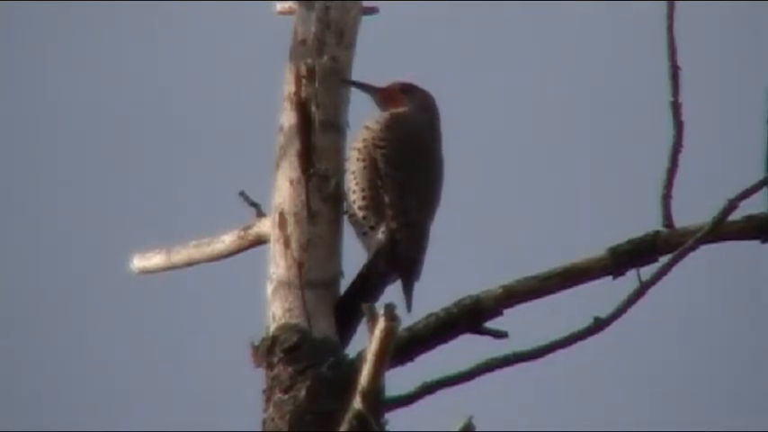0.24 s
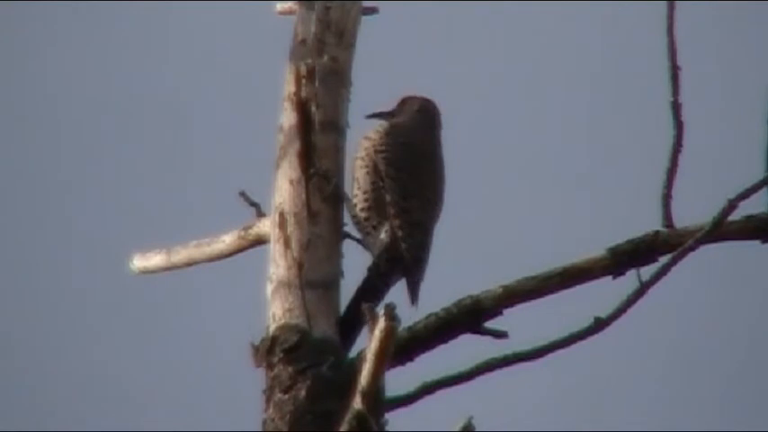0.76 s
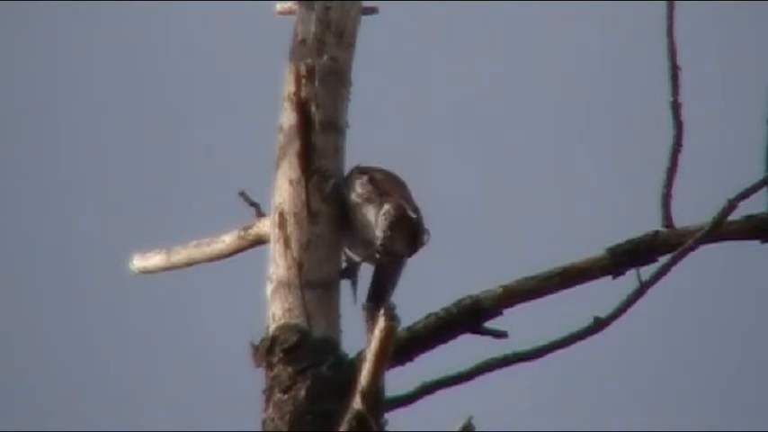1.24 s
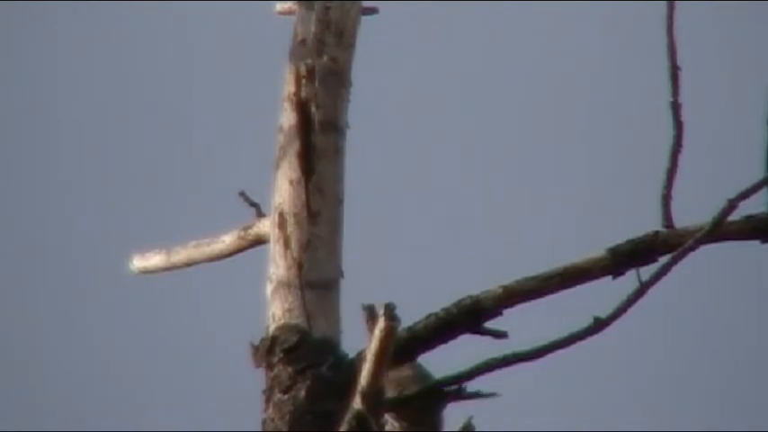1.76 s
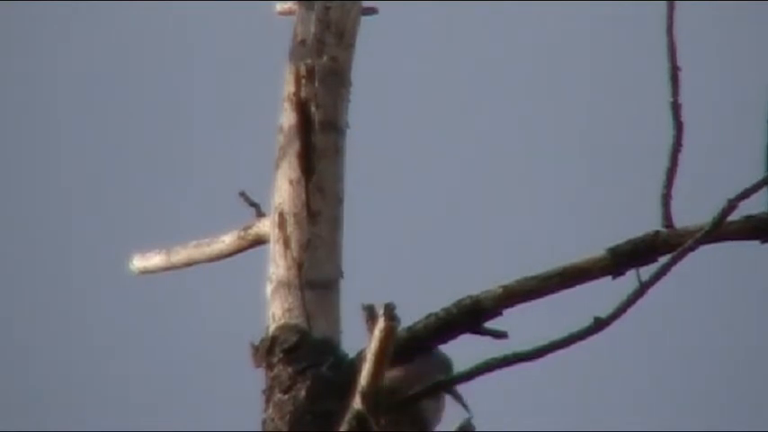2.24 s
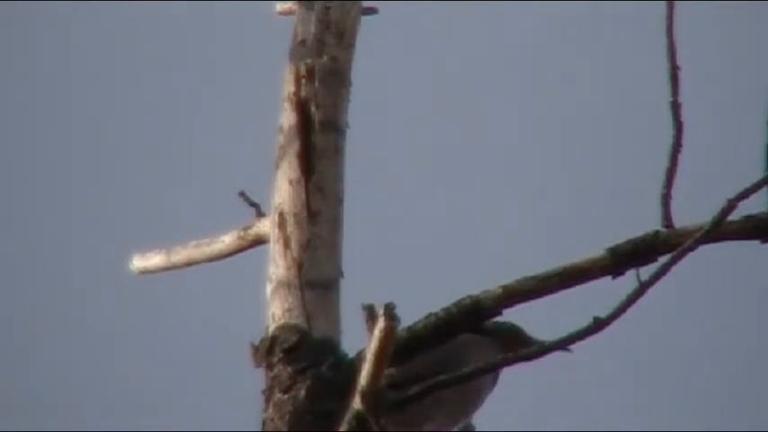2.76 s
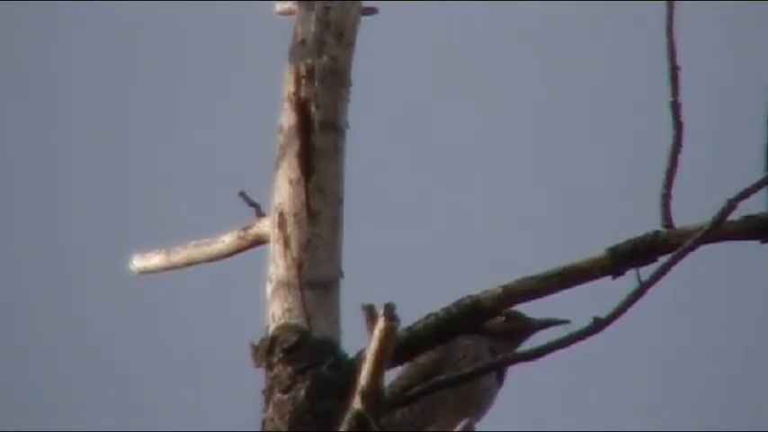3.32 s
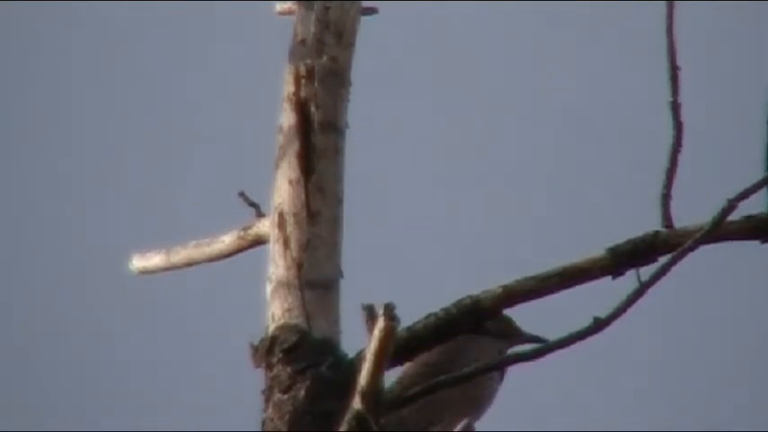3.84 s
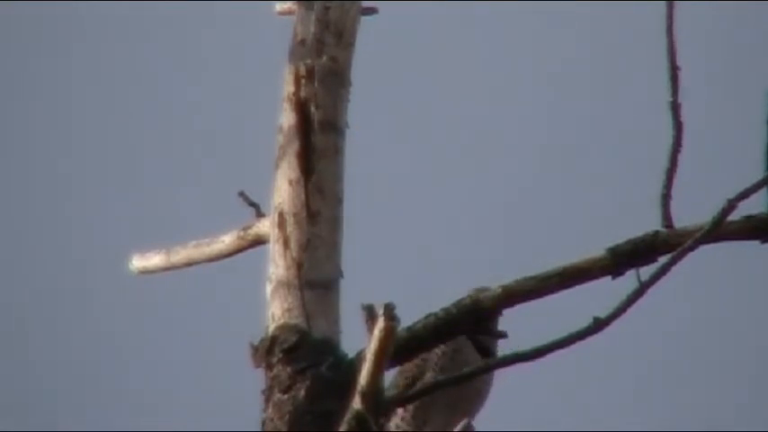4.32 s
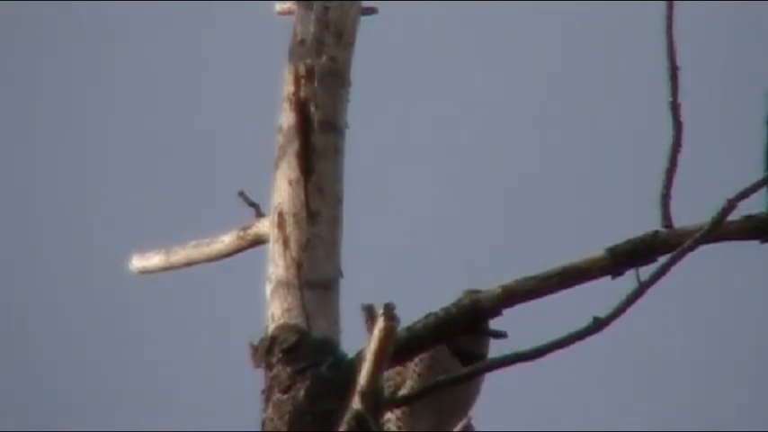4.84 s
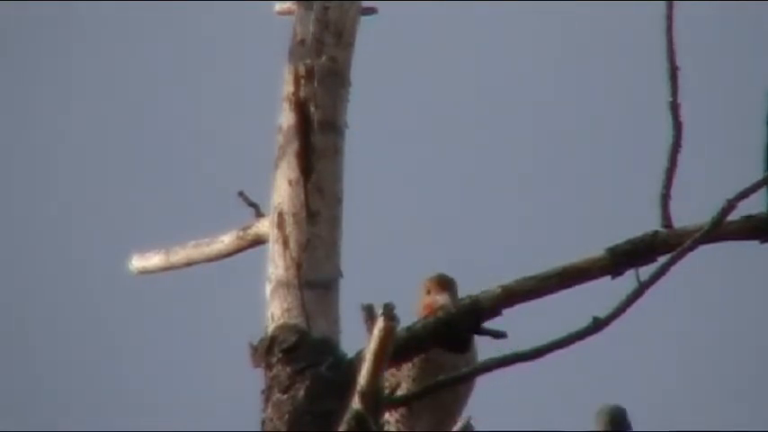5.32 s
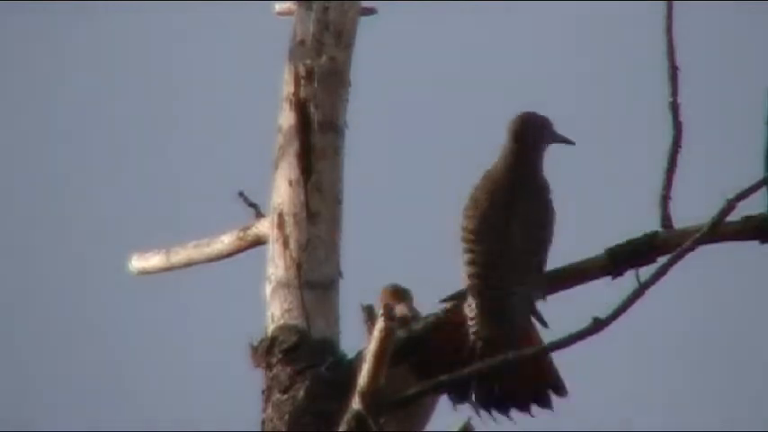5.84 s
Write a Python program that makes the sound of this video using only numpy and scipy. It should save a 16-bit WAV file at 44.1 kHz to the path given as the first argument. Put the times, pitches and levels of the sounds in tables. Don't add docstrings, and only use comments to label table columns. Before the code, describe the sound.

A woodpecker repeats squeaky rising slurs ending in sharp high pips, with low chucks between, swelling then fading, while a second bird answers softly outdoors.

```python
import sys
import numpy as np
from scipy import signal
from scipy.fft import rfft, irfft, next_fast_len
from scipy.io import wavfile
from scipy.ndimage import uniform_filter1d, map_coordinates

SR = 44100
rng = np.random.default_rng(int(sys.argv[2]) if len(sys.argv) > 2 else 0)


def wav_record(signal):
    frames = np.transpose(np.atleast_2d(signal))
    bounded = np.clip(frames, -1, 1)
    quanta = np.round(bounded * 32767).astype(np.int16)
    wavfile.write(sys.argv[1], SR, quanta)


def invert_db(level):
    return 10 ** (np.asarray(level, dtype=float) / 20)


N = 268083


def unit(x):
    return x / np.sqrt(np.mean(x ** 2) + 1e-20)


def along(points, hz):
    f, v = np.transpose(points)
    return np.interp(np.log(hz + 1), np.log(f + 1), v)


def wobble(rate):
    knots = rng.standard_normal(int(N * rate / SR) + 4)
    return map_coordinates(knots, [np.arange(N) * rate / SR])


def coloured(x, spectrum):
    m = next_fast_len(len(x) + 8192)
    gain = invert_db(along(spectrum, np.fft.rfftfreq(m, 1 / SR)))
    return irfft(rfft(x, m) * gain, m)[:len(x)]


# (frequency [Hz], level [dB per Hz])
HISS_COLOUR = [(12, -47), (20, -20), (44, -30), (129, -18.5), (239, -8.5), (274, -8), (506, -4), (727, -3),
               (1630, -4), (2690, -6), (4090, -8.5), (8200, -11.5), (15600, -17)]


def hiss():
    drift_db = 0.3 * wobble(3) + 0.25 * wobble(12)
    return invert_db(-60.5 + drift_db) * unit(coloured(rng.standard_normal(N), HISS_COLOUR))


def bends(flick, snap):
    t = np.arange(N) / SR
    whip, drop = np.zeros(N), np.zeros(N)
    for s, *_ in PIPS:
        whip += flick * np.exp(np.minimum(t - s + 0.004, 0) / 0.0035) * (t < s + 0.05)
    for s, *_ in CHUCKS:
        drop += snap * np.clip((s + 0.0015 - t) / 0.0028, 0, 1) * (t > s - 0.05)
    return 1 + whip + drop


# (time [s], beak towards microphone [dB], hoarseness [0-2], first partial [dB], even partials [dB])
FACING = [(1.3, -5, 0.89, 1.5, 0), (1.6, -3, 1.04, 6.5, 0.5), (1.92, -1.5, 1.91, 2.5, -0.5),
          (2.17, 3.5, 1.09, 4.5, 1), (2.45, -1.5, 0.58, 0.5, 2.5), (2.72, -1.5, 0.92, -2.5, -1.5),
          (2.87, 5, 1.805, 2.5, 4.5), (2.96, -1.5, 1.29, -2, 3), (3.03, -2, 1.25, -2.5, 0),
          (3.27, -0.5, 0.91, -3.5, 1), (3.552, 0.5, 0.786, 1, 8), (3.66, -0.5, 1.062, -0.5, 6.5),
          (3.899, -4.5, 0.93, -6, -0.5), (4.25, -3.5, 0.54, -5.5, 2.5), (4.9, 1, 0.773, 1, 1.5),
          (5.5, -6, 0.58, -8, -2.5), (5.77, -1, 0.72, 6, 1), (6.01, -13, 0.67, -5, -5)]
# (time [s], shift [dB])
GAPE = [(1.25, -0.5), (1.36, -3), (1.83, -0.5), (1.92, -1.5), (1.96, -3.5), (2.45, 1.5), (2.8, -2.5),
        (2.95, 1.5), (3.0, 5), (3.055, 0), (3.27, 0), (3.5, -3), (3.64, 2), (4.16, 1.5), (4.28, 1.5),
        (4.9, -2), (5.47, -0.5), (6.0, -5.5)]


def timbre(t):
    s, *_, first_db, even_db = np.transpose(FACING)
    first_db, even_db = np.interp(t, s, first_db), np.interp(t, s, even_db)
    gape_db = np.interp(t, *np.transpose(GAPE))
    return np.array([first_db, even_db - gape_db, 0 * t, even_db + gape_db])


def partials(t, pitch_hz, level_db, whip, throat, whip_db, thin_db):
    k = np.arange(1, 5)[:, None]
    quiet = np.clip(1 - 0.04 * (level_db + 62.5), 0.75, 2)
    thinning_db = thin_db * quiet * whip ** 2 * np.clip(k - 2, 0, 1.4)
    low_db = level_db + along(throat, k * pitch_hz) + np.outer(whip_db, whip) - thinning_db
    return np.vstack([t, pitch_hz, low_db])


def glide(start, end, hz, rise, db, swell_db):
    t = np.linspace(start, end, num=80)
    u = (t - start) / (end - start)
    soft_start_db = 4.5 * np.exp((start - t) / 0.0091)
    level_db = db - swell_db * (1 - u) ** 1.75 - soft_start_db
    return t, hz * (1 + rise * u ** 1.4), level_db


# (time [s], pitch [Hz], level [dB], length [s], fall [share of pitch])
CHUCKS = [
    (0.936, 899.5, -62, 0.054, 0.15),
    (1.6, 978, -60, .033, .36),
    (2.167, 1011, -52, .032, .36),
    (2.71, 976.5, -41, 0.043, 0.34),
    (3.264, 916, -42.5, 0.033, 0.37),
    (3.895, 887, -47, 0.057, .38),
    (4.529, 862.5, -52.5, 0.031, 0.36),
    (5.197, 900, -57.5, .025, .3),
    (5.755, 895, -60, 0.035, .35),
]
# (time after onset [s], partials 1, 2, 3 and 4 [dB])
CHUCK_SHAPE = [
    (0, -4, -1.5, -1, -20),
    (0.015, -5, -16.5, -7, -15.5),
    (.027, -21, -16, -14, -12),
    (.04, -20, -12.5, -28, -26),
    (.075, -34, -12, -32, -34),
]
# (start [s], pitch [Hz], slow rise [share], level [dB], swell [dB])
SLURS = [
    (1.17, 881.3, .045, -58.5, 14.5),
    (2.33, 816.6, 0.15, -45.5, 19.5),
    (5.95, 725, 0.086, -65, -1),
]
# (time [s], pitch [Hz], level [dB])
HOARSE = [
    [(1.74, 815, -76), (1.764, 812, -67), (1.834, 930, -55.5), (1.85, 840, -56.5), (1.862, 918, -55),
     (1.93, 1065, -50.5), (1.95, 1175, -51), (1.969, 1178, -50.5), (1.979, 1460, -55.5)],
    [(2.75, 751, -54.5), (2.818, 705, -60.5), (2.852, 774, -58), (2.884, 810, -57.5), (2.915, 746, -50.5)],
    [(2.915, 771, -52.5), (2.949, 876, -42.5), (2.968, 805, -48.5), (2.984, 886, -42), (3.027, 923, -39.5),
     (3.043, 1088, -37), (3.06, 1092, -38), (3.071, 1243, -39), (3.085, 1366, -45)],
    [(4.13, 766, -63), (4.146, 818, -56), (4.172, 758, -50), (4.192, 809, -53.5), (4.21, 797, -52.5),
     (4.288, 851, -48), (4.304, 1029, -47), (4.315, 1275, -48)],
    [(5.38, 708, -65), (5.404, 730, -64), (5.47, 723, -54), (5.5, 812, -49.5), (5.515, 793, -51.5),
     (5.536, 831, -51), (5.554, 947, -53.5), (5.571, 1115, -51.5)],
]
# (time [s], pitch [Hz], level [dB])
WAVER = [(3.465, 703, -79), (3.477, 736, -63.5), (3.52, 779.4, -59), (3.545, 754.6, -55), (3.575, 778, -56),
         (3.62, 826, -54), (3.651, 876, -52.5), (3.665, 1039, -47), (3.675, 1324, -45)]
# (time [s], pitch [Hz], level [dB])
CLIPPED = [(4.83, 744, -70), (4.856, 750, -62), (4.885, 850, -59.5), (4.908, 890, -59), (4.92, 1060, -57),
           (4.927, 1200, -55)]
# (frequency [Hz], level [dB])
THROAT = [(700, -5), (1000, -5.5), (1600, -6.5), (2300, -5), (3000, -4), (3700, -5), (4400, 0), (5600, -5)]


def near_notes():
    whip_s, pip_gap_s, chuck_fall_s = 0.012, 0.004, 0.045
    last_end = (N / SR + 0.079, 2400)
    ends, pip_hz = np.transpose([(s - pip_gap_s, hz) for s, _, hz, *_ in PIPS] + [last_end])
    held = []
    for s, *row in SLURS:
        t, hz, db = glide(s, ends[ends > s][0], *row)
        whip = np.exp((t - t[-1]) / whip_s)
        goal_hz = 0.46 * pip_hz[ends > s][0]
        held.append((t, hz + whip * (goal_hz - hz[-1]), db, whip))
    for s, hz, db in map(np.transpose, HOARSE + [WAVER, CLIPPED]):
        t = np.linspace(s[0], s[-1], num=80)
        whip = np.exp((t - ends[ends > s[0]][0]) / whip_s)
        held.append((t, np.interp(t, s, hz), np.interp(t, s, db), whip))
    notes = [partials(*note, THROAT, whip_db=[5.9, 10.8, 11, 1.8], thin_db=26) for note in held]
    after, *shape_db = np.transpose(CHUCK_SHAPE)
    u = np.linspace(0, 1, num=20)
    for s, hz, db, length, fall in CHUCKS:
        pitch_hz = hz * (1 - fall * (1 - np.exp(-u * length / chuck_fall_s)))
        low_db = [db + np.interp(u * length, after, c) for c in shape_db]
        notes.append(np.vstack([s + u * length, pitch_hz, low_db]))
    return [np.vstack([n[:2], n[2:] + timbre(n[0])]).T.tolist() for n in notes]


# (frequency [Hz], level [dB])
BEAK = [(3500, -1.5), (4500, -10), (6200, -12), (7300, -23.5), (8500, -20.5), (10000, -14.5), (12000, -23),
        (14000, -24), (16000, -42)]
# (frequency [Hz], level [dB per Hz])
BREATH = [(400, -22), (1000, -19.5), (3000, 2.5), (6000, -14.5), (7500, -17.5), (10000, -8.5), (13000, -28),
          (16000, -13)]


def voice(notes, bend, facing_db, hoarse, attack, release, breath_db, brighten):
    t = np.arange(N) / SR
    notes = sorted(notes)
    gates = []
    for n in notes:
        edges = np.minimum((t - n[0][0]) / attack, (n[-1][0] - t) / release)
        gates.append(np.clip(edges + 1, 0, 1))
    gate = np.max(gates, axis=0)
    s, *cols = np.transpose(np.vstack(notes))
    pitch_hz, *low_db = [uniform_filter1d(np.interp(t, s, c), size=180) for c in cols]
    low_db[2:] = [db - 30 * np.maximum(bend - 1.2, 0) for db in low_db[2:]]
    pitch_hz = pitch_hz * bend * (1 + hoarse * (0.00493 * wobble(220) + 0.00423 * wobble(60)))
    phase = 2 * np.pi * np.cumsum(pitch_hz) / SR

    effort_db = 10 * np.log10(sum(invert_db(2 * db) for db in low_db[1:]))
    lift_db = effort_db + brighten * (effort_db + 35.5) + facing_db
    upper_db = 10 * np.log10(sum(invert_db(2 * db) for db in low_db[2:]))
    edge_db = upper_db - effort_db + 2 - 22 * (bend - 1)
    high_db = []
    for k in range(5, 21):
        too_high_db = 99 * (k * pitch_hz > SR / 2.5)
        beak_db = along(BEAK, k * pitch_hz) + facing_db * (k - 5) / 8
        high_db.append(lift_db + edge_db + beak_db - too_high_db)

    patches = wobble(30.086)
    tone = 0
    for k, db in enumerate(low_db + high_db, 1):
        shake = 1.67 * wobble(110) + 0.59 * np.roll(patches, shift=9000 * k)
        flutter_db = hoarse ** 0.61 * (1 + min(k, 9) / 6) * shake
        flutter_db = np.minimum(flutter_db, 3)
        blur = (k / 12) ** 2 * wobble(350)
        tone = tone + invert_db(db + flutter_db) * np.cos(k * phase + k * k / 3.68 + blur)
    puffs = unit(coloured(rng.standard_normal(N), BREATH) * (1 + 0.9 * np.cos(phase)))
    breath = hoarse * invert_db(lift_db + breath_db + 0.77 * wobble(60)) * puffs
    rasp = invert_db(3.34 * np.maximum(hoarse - 1, 0) * wobble(260))
    return gate * (np.sqrt(2) * rasp * tone + breath)


def near_bird():
    t = np.arange(N) / SR
    s, facing_db, hoarse, *_ = np.transpose(FACING)
    return voice(near_notes(), bends(flick=0.16, snap=0.6), np.interp(t, s, facing_db), np.interp(t, s, hoarse),
                 attack=0.004, release=0.00075, breath_db=-12, brighten=0.49)


# (frequency [Hz], time [s])
WOODS_DECAY = [(500, 0.36), (1500, 0.6), (2400, 0.43), (2900, 0.78), (3400, 0.52), (6000, 0.15),
               (12000, 0.16)]
# (frequency [Hz], level [dB])
SCATTER = [(300, -50), (900, -4.5), (1600, -5.5), (2900, -6.5), (5500, -1.5), (9000, -0.5), (16000, 0)]


def woods(x, near_db, far_db, lumps_db):
    t = np.arange(SR) / SR
    near = rng.standard_normal(SR) * invert_db(-60 * t / 0.092) * (t > 0.006)
    lumpy = rng.standard_normal(SR) * invert_db(lumps_db * wobble(71.6)[:SR])
    hz, frames, z = signal.stft(lumpy, SR, nperseg=256)
    decay = invert_db(-60 * frames / along(WOODS_DECAY, hz)[:, None])
    far = signal.istft(z * decay, SR, nperseg=256)[1][:SR] * (1 - np.exp(-t / 0.008))
    answer = invert_db(near_db) * near / np.linalg.norm(near) + invert_db(far_db) * far / np.linalg.norm(far)
    return coloured(signal.fftconvolve(x, answer)[:N], SCATTER)


# (time [s], peak level [dB], pitch [Hz], overtones [dB], length [s])
PIPS = [
    (1.3848, -48, 3006, -17, 0.023),
    (1.9952, -37.5, 3100, -21.5, 0.013),
    (2.5273, -28.5, 3135, -19.5, 0.015),
    (3.0872, -25.5, 2859, -9.5, 0.0202),
    (3.6793, -34, 2795, -11, 0.014),
    (4.318, -34, 2716, -17.5, 0.016),
    (4.9316, -41.5, 2560, -16, 0.016),
    (5.5741, -47, 2468, -21.5, 0.016),
]
# (time [s], peak level [dB], pitch [Hz], overtones [dB], length [s])
STUTTERS = [
    (1.4063, -50, 3050, -16, 0.0068),
    (1.9829, -41.5, 3155, -16, 0.0101),
    (2.0088, -43, 3126, -18, 0.0166),
    (3.1059, -31, 2787, -19, 0.0056),
    (4.3335, -56, 2620, -19, 0.0087),
]


def pips():
    out = np.zeros(N + SR)
    air = unit(coloured(rng.standard_normal(N), BREATH))
    peak_share = 0.48
    for s, db, hz, over_db, length in PIPS + STUTTERS:
        t = np.arange(round(length * SR)) / SR
        u = t / length
        swell = np.sin(np.pi * u ** (np.log(0.5) / np.log(peak_share))) ** 0.55
        phase = 2 * np.pi * hz * t * (1 - 0.016 * u ** 3)
        steps = [(2, -1), (3, -7.5), (4, -12.5), (5, -19)]  # (overtone number, level [dB])
        overtones = sum(invert_db(step_db) * np.cos(k * phase) for k, step_db in steps)
        i = round((s - 0.003) * SR)
        extras = swell ** 2 * overtones + invert_db(-10.0) * air[i:i + len(t)]
        out[i:i + len(t)] += invert_db(db) * swell * (np.cos(phase) + invert_db(over_db) * extras)
    return out[:N]


# (time [s], peak level [dB])
TICKS = [
    (1.434, -43),
    (5.8179, -44.5),
]
# (frequency [Hz], level [dB])
CLAW = [(3000, -30.5), (6500, -4.5), (9000, -4.5), (12000, -8.5), (14000, -25.5), (16000, -50.5)]


def ticks():
    out, t = np.zeros(N + SR), np.arange(400) / SR
    for s, db in TICKS:
        scrape = np.diff(rng.standard_normal(len(t) + 1)) * 1.75
        out[round(s * SR):][:len(t)] += invert_db(db - 60 * t / 0.0054) * scrape
    return coloured(out[:N], CLAW)


# (start [s], end [s], pitch [Hz], slow rise [share], level [dB])
ANSWERS = [
    (1.923, 2.031, 820, 0.015, -66),
    (4.01, 4.192, 808, 0.12, -63.5),
    (4.548, 4.731, 815, .12, -59),
    (5.033, 5.274, 818, 0.09, -60),
    (5.663, 5.864, 784, 0.11, -63.5),
]
# (frequency [Hz], level [dB])
THROAT_FAR = [(750, 8.5), (1000, -18), (1600, -23), (2000, 2), (2400, -7.5), (2700, -0.5), (3400, -14.5),
              (5000, -17)]
# (time [s], third and fourth partial [dB])
FACING_FAR = [(1.98, 3), (4.1, 4), (4.64, 2.5), (5.15, 0), (5.75, -2)]


def far_notes():
    break_lead_s = 0.022
    notes = []
    for row in ANSWERS:
        t, hz, db = glide(*row, swell_db=8)
        late = t - t[-1] + break_lead_s
        whip = 1 / (1 + np.exp(-late / 0.0085))
        fade_db = 28 * np.clip(late / break_lead_s, 0, 1) ** 3
        note = partials(t, hz * (1 + 0.58 * whip), db - fade_db, whip, THROAT_FAR,
                        whip_db=[31, 10, -15, -8], thin_db=8)
        note[4:] += np.interp(t, *np.transpose(FACING_FAR))
        notes.append(note.T.tolist())
    return notes


def far_bird():
    facing_db = np.interp(np.arange(N) / SR, [2.1, 3.9], [7, -3])
    return voice(far_notes(), 1, facing_db, 0.426, attack=0.00655, release=0.0035, breath_db=-22, brighten=0.4)


# (time [s], pitch [Hz], level [dB])
WHISTLE = [
    (5.822, 3342, -67),
    (5.845, 3480, -65),
    (5.869, 3630, -67),
    (5.877, 3200, -130),
    (5.895, 2760, -68),
    (5.928, 2706, -64),
    (5.942, 2750, -74),
]


def thin_tones():
    t = np.arange(N) / SR
    s, hz, db = np.transpose(WHISTLE)
    level = invert_db(np.interp(t, s, db, -150, -150))
    return level * np.sin(2 * np.pi * np.cumsum(np.interp(t, s, hz)) / SR)


# (frequency [Hz], level [dB])
MIC = [(100, -40), (450, -6), (700, 0)]


def scene():
    birds = near_bird() + far_bird() + pips() + thin_tones()
    echoes = woods(birds, near_db=-4.0, far_db=-14.0, lumps_db=4.5)
    mono = coloured(birds + echoes, MIC) + ticks() + hiss()
    return np.array([mono, mono])


# (time [s], low edge [Hz], high edge [Hz])
SPLITS = [
    (3.01, 4200, 5800),
    (3.01, 6300, 8300),
    (3.01, 11000, 15300),
]


def parted(mono, share):
    side, window = np.zeros(N), np.hanning(1400) ** 0.5
    chance = rng.uniform(size=(20, 3))
    start_s = chance[:, 0] * (N / SR - 0.1) + 0.053
    low_hz = 4000 + 9000 * chance[:, 1]
    faint = np.transpose([start_s, low_hz, low_hz * (1.072 + 0.167 * chance[:, 2])])
    for s, lo_hz, hi_hz in [*SPLITS, *faint]:
        i = round(s * SR) - 700
        band = signal.butter(4, [lo_hz, min(hi_hz, 15500)], 'bandpass', fs=SR, output='sos')
        side[i:i + 1400] += share * window * signal.sosfilt(band, mono[i - 90:i + 1310])
    return side


# (frequency [Hz], level [dB])
BAND = [(15680, 0), (15750, -90)]


def roll_off(x):
    return signal.sosfilt(signal.butter(12, 15710, fs=SR, output="sos"), x)


def record(dry):
    mono = coloured(dry[0], BAND)
    stereo = mono + parted(mono, share=0.75) * np.array([[1], [-1]])
    return roll_off(stereo)


dry = scene()
out = record(dry)
wav_record(out)
```